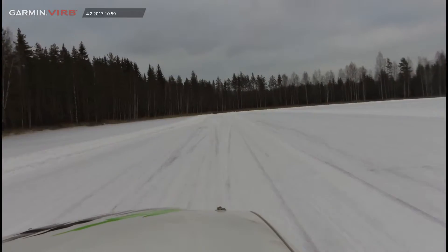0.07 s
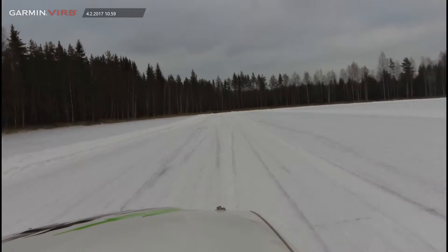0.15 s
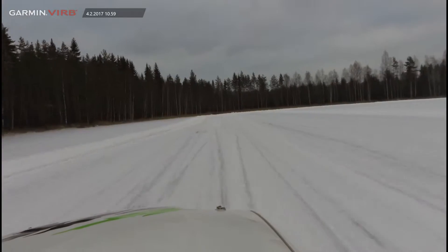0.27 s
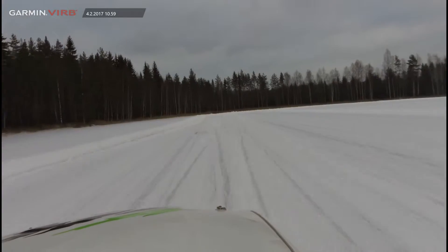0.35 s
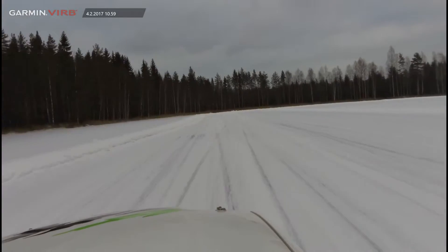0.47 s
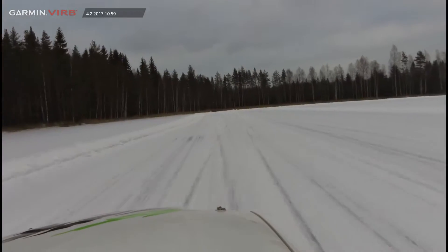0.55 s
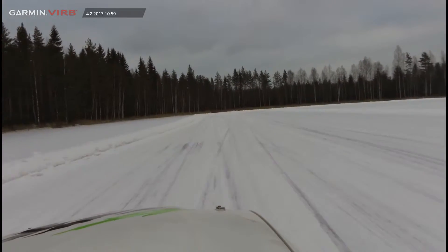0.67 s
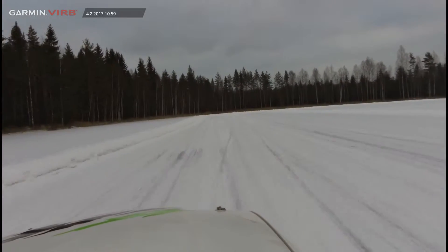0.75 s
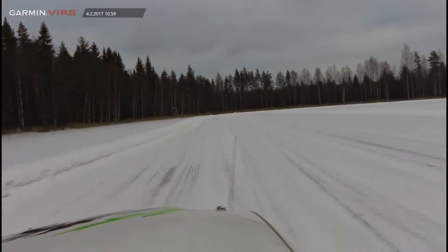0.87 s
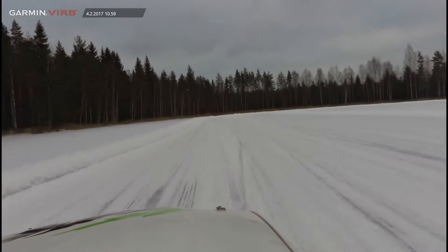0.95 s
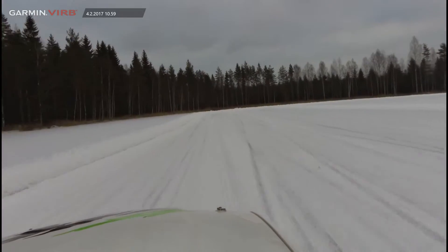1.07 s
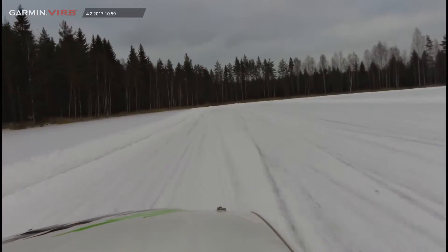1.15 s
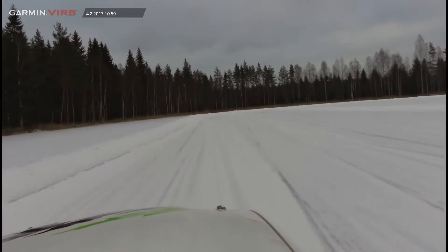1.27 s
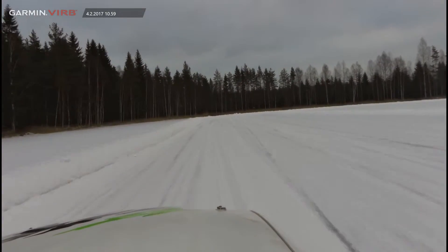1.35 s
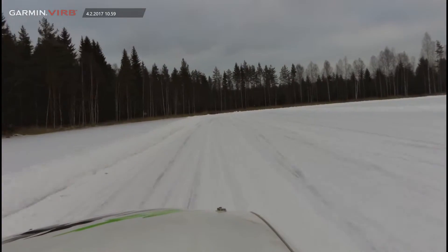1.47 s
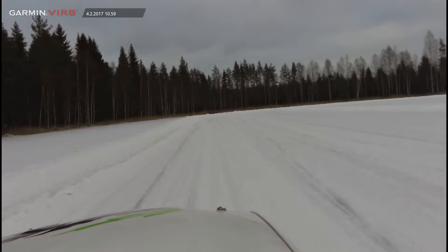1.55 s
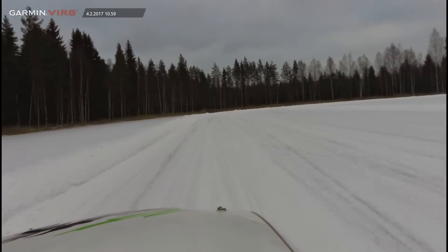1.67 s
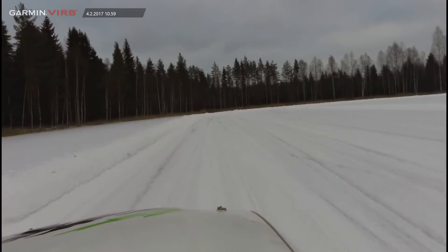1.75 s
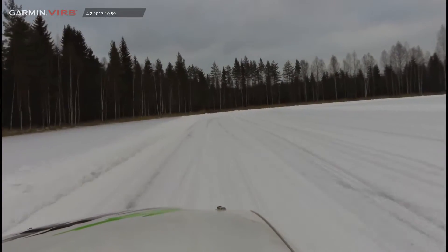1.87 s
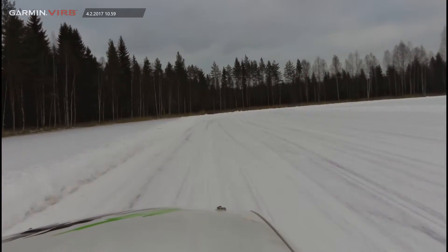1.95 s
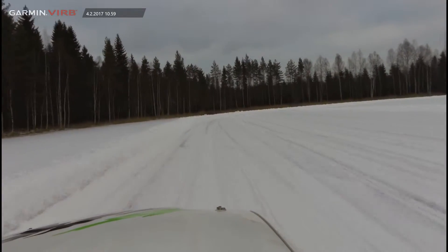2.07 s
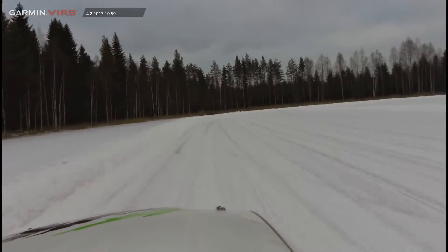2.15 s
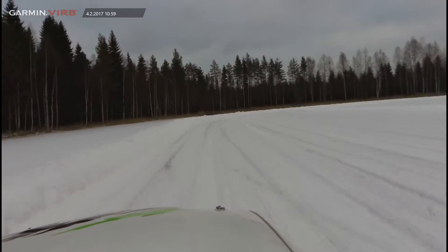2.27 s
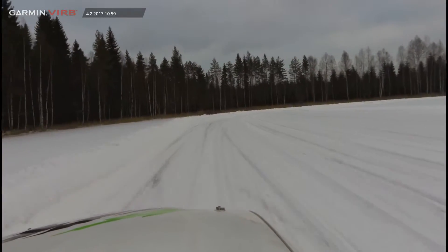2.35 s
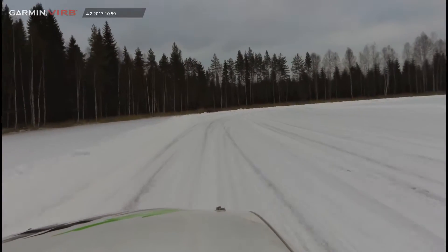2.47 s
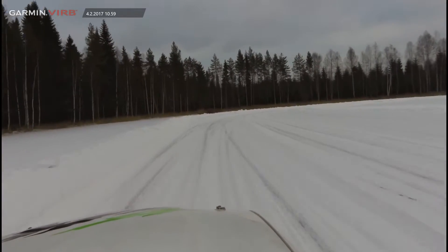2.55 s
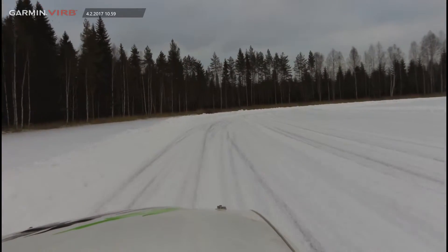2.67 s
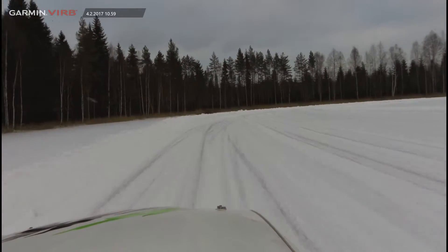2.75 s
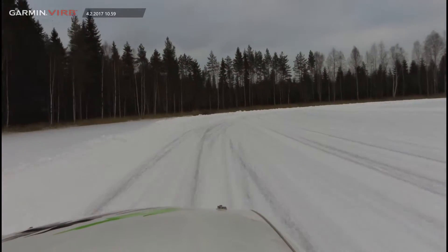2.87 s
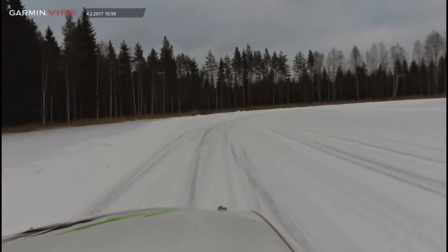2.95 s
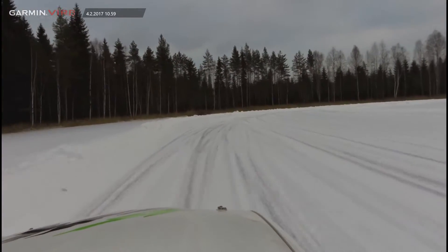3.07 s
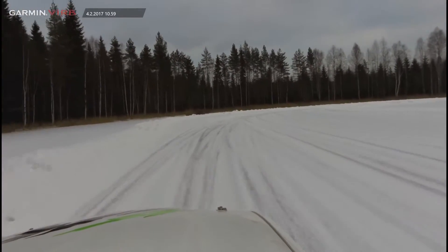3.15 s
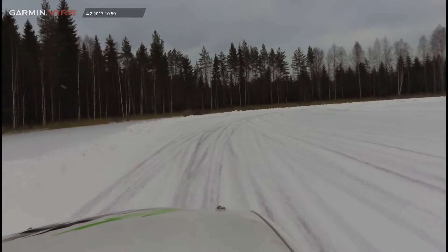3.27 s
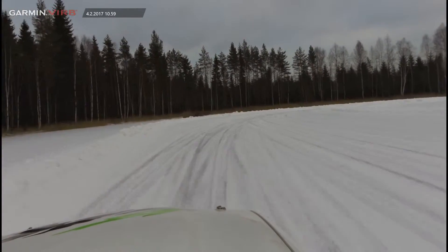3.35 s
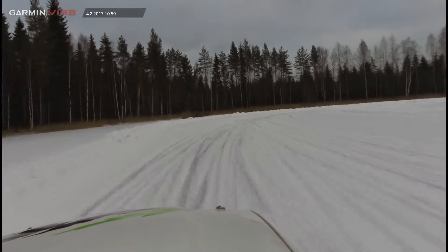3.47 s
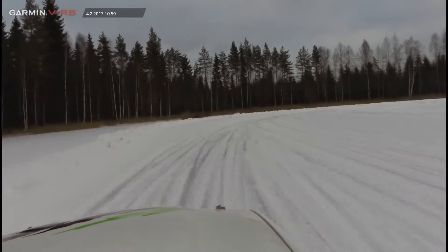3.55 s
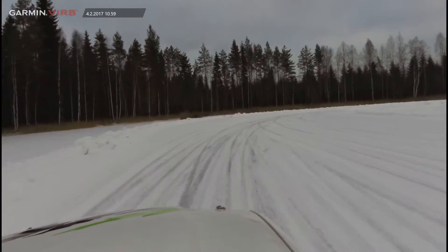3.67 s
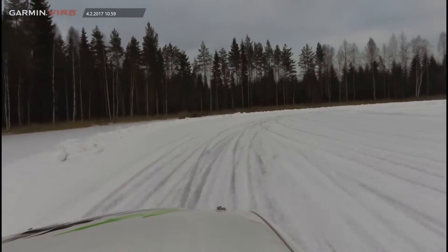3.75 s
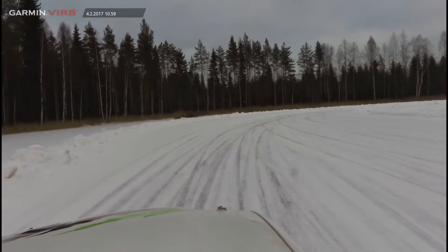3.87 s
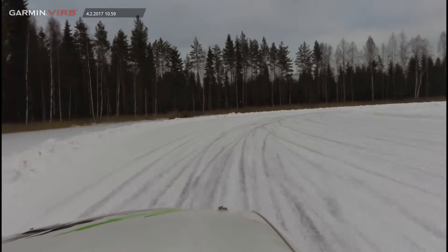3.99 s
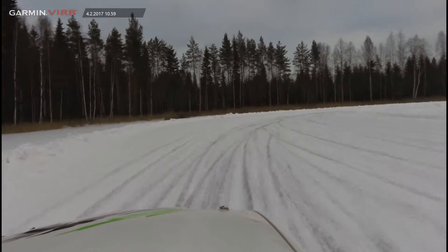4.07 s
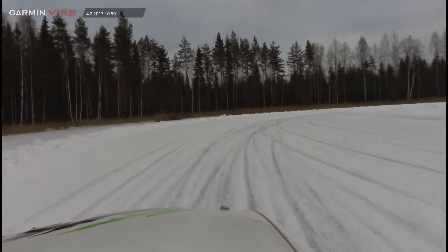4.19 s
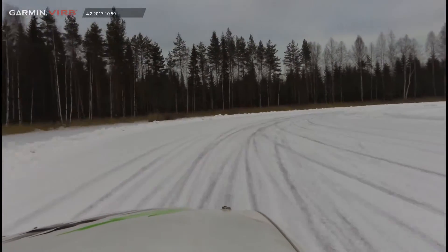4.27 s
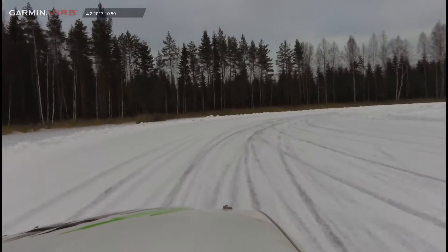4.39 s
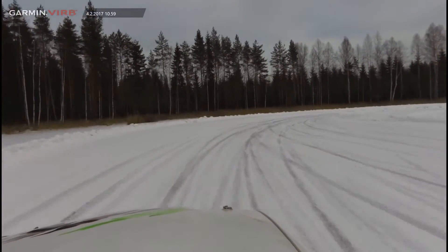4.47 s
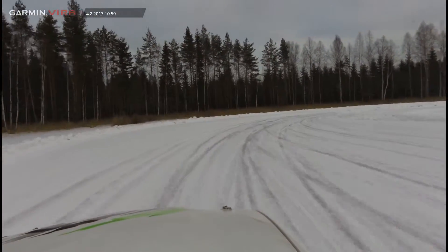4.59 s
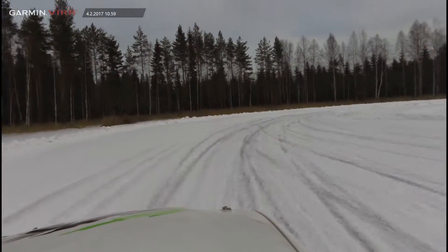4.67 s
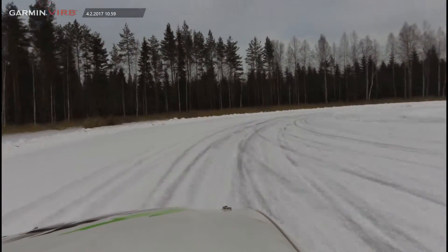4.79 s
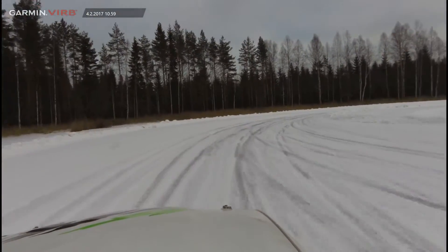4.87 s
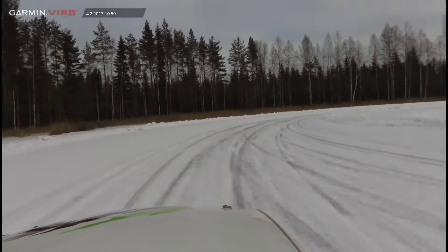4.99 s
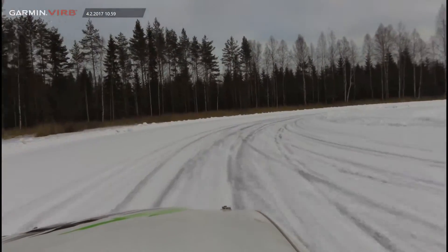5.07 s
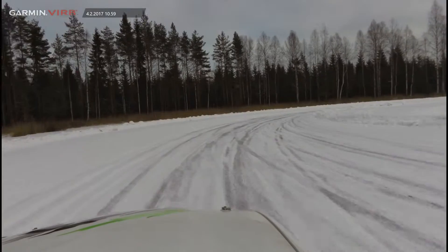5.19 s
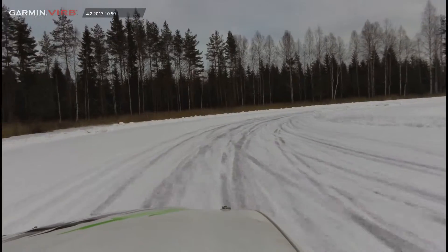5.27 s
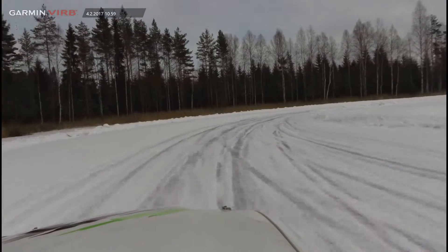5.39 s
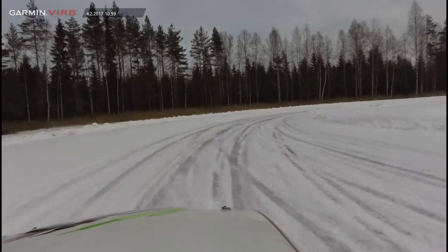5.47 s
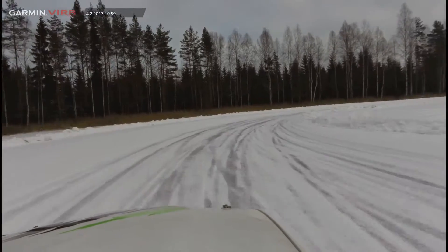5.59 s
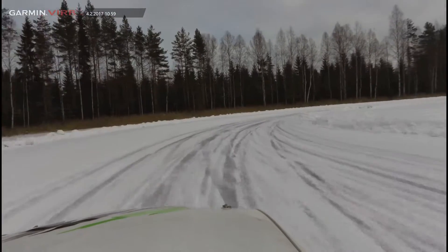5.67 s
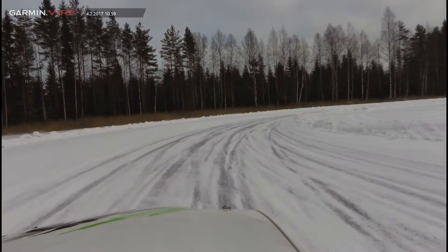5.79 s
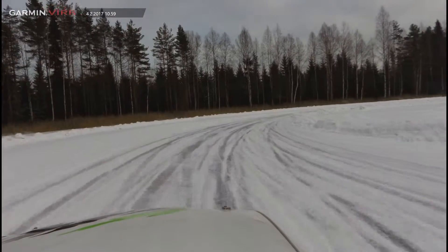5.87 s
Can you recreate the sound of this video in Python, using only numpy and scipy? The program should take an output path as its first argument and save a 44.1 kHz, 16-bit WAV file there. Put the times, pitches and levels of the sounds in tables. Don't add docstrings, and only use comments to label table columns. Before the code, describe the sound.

Loud, overloaded wind roars and buffets across an exposed microphone on a speeding car, then weakens and darkens, with crackles and small ticks.

```python
import sys
import numpy as np
from scipy import signal
from scipy.fft import rfft, irfft
from scipy.io import wavfile
from scipy.ndimage import uniform_filter1d

SR = 44100
rng = np.random.default_rng(int(sys.argv[2]) if len(sys.argv) > 2 else 0)


def to_wav(sig):
    pcm = np.clip(np.atleast_2d(sig), -1, 1) * 32767
    pcm = np.round(pcm).astype(np.int16)
    wavfile.write(sys.argv[1], SR, pcm.T)


def magnitude_from_level(level_db):
    exponent = np.asarray(level_db, float) / 20
    return 10 ** exponent


N = 261513

# [t/s, level/dB]
ROAR = [(0, -8), (1.1, -8), (2.0, -9), (2.55, -9), (2.7, -9.5), (3.15, -11), (3.45, -12.5), (3.76, -14.5),
        (3.9, -12.5), (4.3, -14.5), (4.6, -14), (4.83, -12), (5.0, -15.5), (5.1, -17), (5.35, -15),
        (5.62, -15.5), (5.72, -15.5), (5.93, -15.5)]
# [t/s, speed/share, buffeting level/dB]
SPEED = [(0, 1.075, 1.5), (.5, 1.122, 1), (1, 1.09, 0), (1.8, 1.068, -0.5), (2.1, 1.045, 0),
         (2.5, 0.99, -0.5), (2.801, 0.99, 1.5), (3.2, 0.96, -0.5), (3.499, 0.95, -1.5), (4.201, 0.93, -0.5),
         (4.5, 0.87, 0), (4.8, 0.9, -5), (5.15, 0.98, 0.5), (5.35, .88, -3), (5.93, 0.83, -4)]
# [f/Hz, level per Hz/dB]
EDDIES = [(30, 8), (80, 1), (200, -1.5), (350, -2.13), (550, -1.5), (800, -9), (1200, -19), (2000, -32.5),
          (3500, -50.5), (6000, -66.5), (11000, -90)]
# [t of slap/s, depth/dB]
LULLS = [(.472, 12.5), (1.195, 4.5), (2.108, 3), (2.745, 11), (2.835, 7), (3.01, 4), (3.235, 8.5),
         (3.335, 4), (3.354, 14), (3.413, 3), (3.516, 6), (3.613, 8.5), (3.664, 9.5), (3.792, 5), (3.86, 8),
         (4.203, 4), (4.45, 4.5), (4.559, 4.5), (4.723, 4.5), (5.395, 0), (5.43, 6)]
# [t of release/s, snap level/dB]
SHOVES = [(2.766, -31), (2.839, -32), (2.976, -34), (3.137, -30.5), (3.191, -32), (3.299, -34), (3.39, -35),
          (3.453, -36), (3.539, -37), (3.567, -37.5), (3.653, -37), (3.70, -30), (3.815, -42),
          (3.964, -31.5), (3.993, -36), (4.012, -34), (4.071, -34), (4.131, -32), (4.145, -30.5),
          (4.285, -35.5), (4.642, -37), (4.767, -37), (4.778, -37), (4.807, -35), (4.826, -29),
          (4.888, -33), (5.227, -39), (5.272, -39), (5.439, -37), (5.687, -40)]
# [t/s, peak level/dB, brightness level/dB]
CRUMBS = [(2.698, -20.5, -11.5), (2.748, -32, -5), (3.277, -28, -14), (4.3616, -46, -13),
          (4.3811, -25, -15), (4.3927, -41, -11), (4.409, -36, -16), (5.0734, -34.5, -9),
          (5.0828, -40, -18), (5.16, -31.5, -14), (5.1808, -45, -15), (5.1829, -26.5, -14),
          (5.5035, -32.5, -13), (5.793, -37, -12.5), (5.804, -47, -20), (5.908, -34, -10)]
# [f/Hz, level/dB, time to fade by 60 dB/s]
HOUSING = [
    (3050, -7, 0.0087),
    (3890, -2.5, 0.0056),
    (4370, -7, 0.0031),
    (6000, -2.5, 0.0045),
    (7600, -11.5, 0.0038),
]


def wind(roar_db, speed, buffet_db):
    table_hz, table_db = np.transpose(EDDIES)
    gust, burst = walk(30), walk(150)
    out = 0
    for k in range(18):
        hz = 30 * 2 ** (k / 2)
        small = np.clip(np.log2(hz / 600), 0, 2.5)
        large = np.clip(np.log2(250 / hz), 0, 1)
        db = np.interp(np.log(hz / speed ** 1.82), np.log(table_hz), table_db)
        db = db + 0.5 * gust + 0.28 * walk(14)
        db = db + small * (1.1 * burst + 7.5 * np.log(speed)) + large * buffet_db
        out = out + magnitude_from_level(db) * band(hz, 0.46)
    steady = out / np.sqrt(uniform_filter1d(out ** 2, SR // 2))
    extra_db = 0.66 * np.maximum(roar_db + 13, 0) + 2.5
    return steady * magnitude_from_level(roar_db + extra_db)


def walk(rate):
    hold = int(SR / rate)
    steps = np.repeat(rng.standard_normal(N // hold + 1), hold)
    return 1.25 * uniform_filter1d(uniform_filter1d(steps, hold), hold)[:N]


def band(hz, octaves):
    f = np.arange(N // 2 + 1) * SR / N + 1
    bell = np.exp(-(np.log2(f / hz) / octaves) ** 2)
    return irfft(rfft(rng.standard_normal(N)) * bell, N)


def lulls(t):
    lull_s, slap_s, slap_share, slap_fade_s = 0.0067, 0.0041, 0.2, 0.0082
    out = 0
    for s, depth_db in LULLS:
        back = np.clip((t - s) / slap_s + 1, 0, 1)
        dip = np.exp(-((t - s) / lull_s) ** 2)
        slap = slap_share * np.exp(-np.abs(t - s) / slap_fade_s)
        out = out + 1.67 * depth_db * (back * slap - (1 - back) * dip)
    return out


def shoves():
    push_db, build_s, release_s = -7, 0.0022, 0.0005
    snap_db, snap_s, snap_round_s = 26, 0.0003, 0.00005
    crackle_per_s, crackle_db, crackle_spread_db = 70, -51, 3
    crackle_slope = 1.8
    release, size = np.zeros(N), np.zeros(N)

    chance = rng.random((int(crackle_per_s * N / SR), 2))
    place = chance[:, 0] * N
    roar_db = np.interp(place / SR, *np.transpose(ROAR))
    luck_db = -crackle_spread_db * np.log(chance[:, 1] + .02)
    size[place.astype(int)] = magnitude_from_level(crackle_db + crackle_slope * (roar_db + 14) + luck_db)

    for s, db in SHOVES:
        release[int(s * SR)] = 1
        size[int(s * SR)] = magnitude_from_level(db)

    t = np.arange(-512, 513) / SR
    push_shape = np.exp(-(t / np.where(t < 0, build_s, release_s)) ** 2)
    snap_shape = np.exp(-np.hypot(t, snap_round_s) / snap_s)
    push = magnitude_from_level(push_db) * signal.fftconvolve(release, push_shape, "same")
    snap = magnitude_from_level(snap_db) * signal.fftconvolve(size, snap_shape, "same")
    return push, snap


def saturate(x, top, knee):
    knee = np.clip(knee, 1, 30)
    return x / (1 + np.abs(x / top) ** knee) ** (1 / knee)


def crumbs():
    length = 2048
    out, t = np.zeros(N + length), np.arange(length) / SR
    chance = rng.standard_normal((len(CRUMBS), 2 * len(HOUSING)))
    for (s, db, bright_db), c in zip(CRUMBS, chance):
        start = int(s * SR)
        for k, (hz, mode_db, t60) in enumerate(HOUSING):
            rise = 1 - np.exp(-(t * hz ** 2 / 6800.0) ** 2)
            gain = magnitude_from_level(db + mode_db + 8 + .6 * c[2 * k] + bright_db * (hz > 5000))
            struck_hz = hz * (1 + .025 * c[2 * k + 1])
            fade = np.exp(-np.log(1000) * t / t60)
            out[start:start + length] += gain * rise * np.sin(2 * np.pi * struck_hz * t) * fade
    return out[:N]


def scene():
    t = np.arange(N) / SR
    s, speed, buffet_db = np.transpose(SPEED)
    roar_db = np.interp(t, *np.transpose(ROAR))
    air = wind(roar_db, np.interp(t, s, speed), np.interp(t, s, buffet_db)) * magnitude_from_level(lulls(t))
    push, snap = shoves()
    air = air + push
    stop = np.where(air > 0, .78, 1.02)
    membrane = saturate(air, stop, knee=10.)
    return (membrane + snap + crumbs())[None]


def butter(x, hz, kind, order):
    return signal.sosfilt(signal.butter(order, hz, kind, fs=SR, output="sos"), x)


def roll_off(x):
    return signal.sosfilt(signal.butter(12, 15590, fs=SR, output="sos"), x)


def record(dry):
    thinned = butter(butter(dry, 303, "high", order=1), 70, "high", order=2)
    driven = saturate(magnitude_from_level(1.99) * thinned, top=1.0, knee=2.44)
    softened = butter(driven, 3500, "low", order=1)
    sagging = butter(softened, 57, "high", order=1)
    clipped = saturate(sagging, top=.71, knee=30.)
    steep = signal.ellip(10, .1, 60, 12400, fs=SR, output="sos")
    cut = signal.sosfilt(steep, clipped)
    hiss = magnitude_from_level(-102) * rng.standard_normal(dry.shape)
    return roll_off(cut + hiss)


dry = scene()
out = record(dry)
to_wav(out)
```